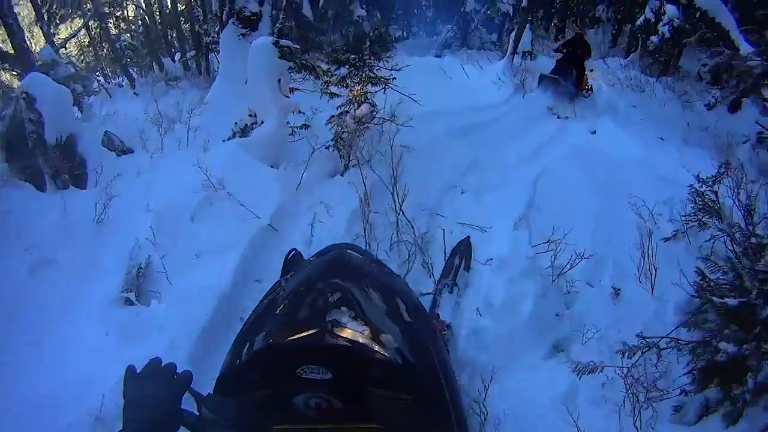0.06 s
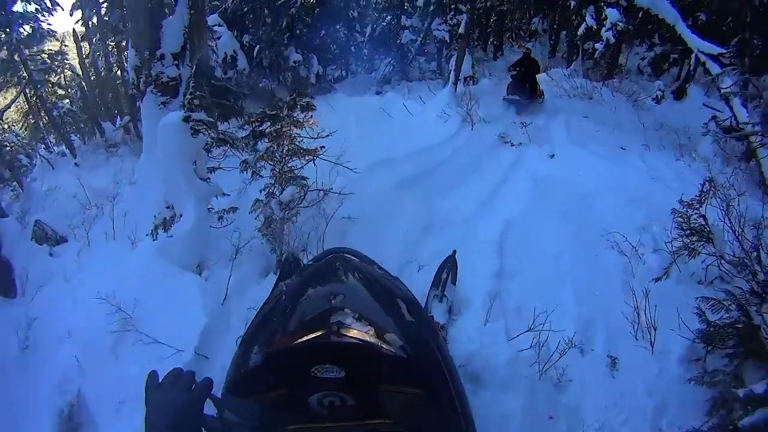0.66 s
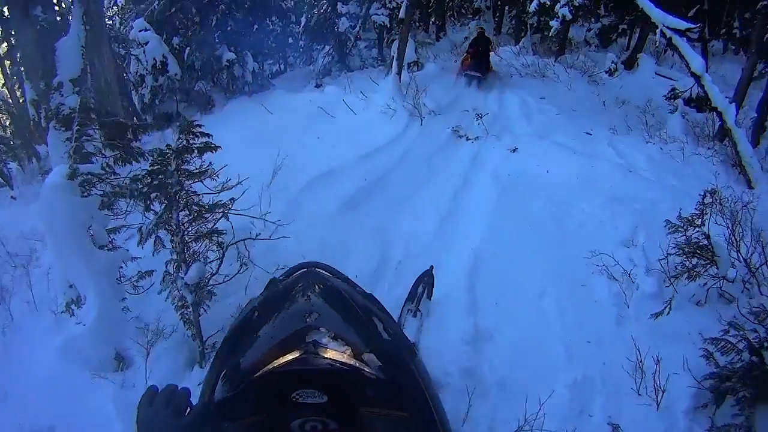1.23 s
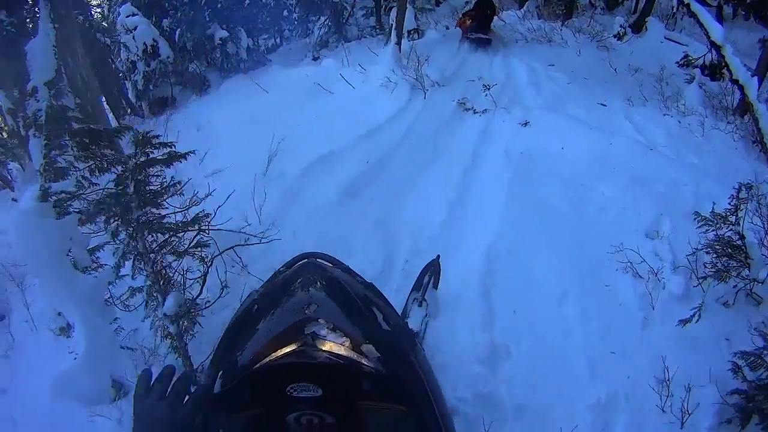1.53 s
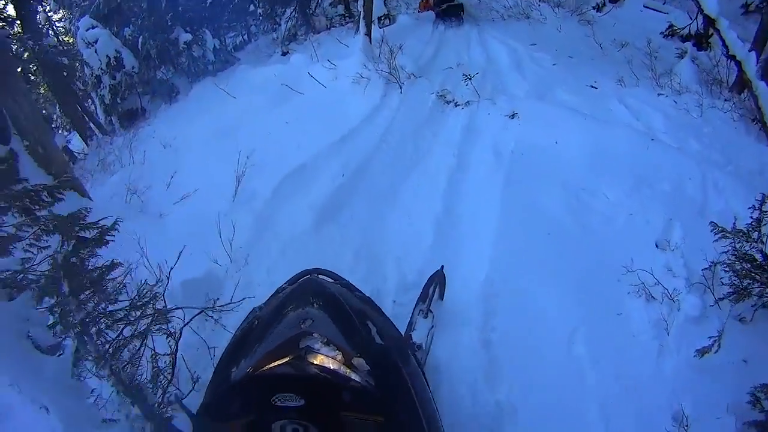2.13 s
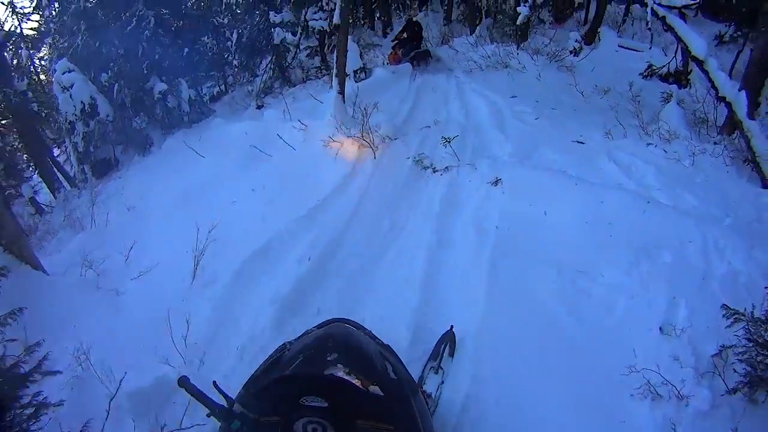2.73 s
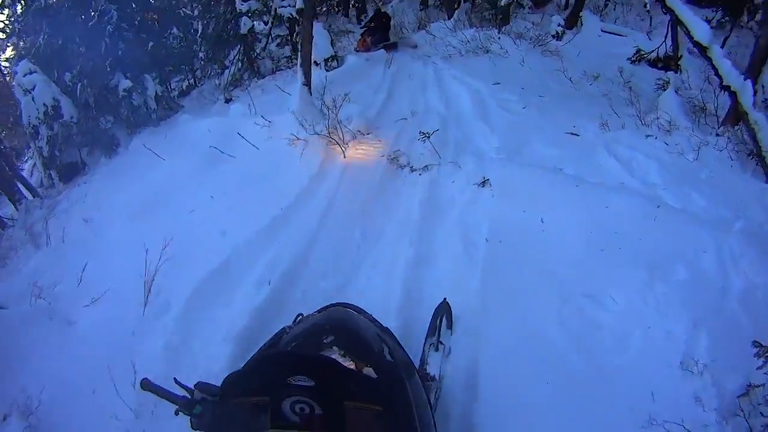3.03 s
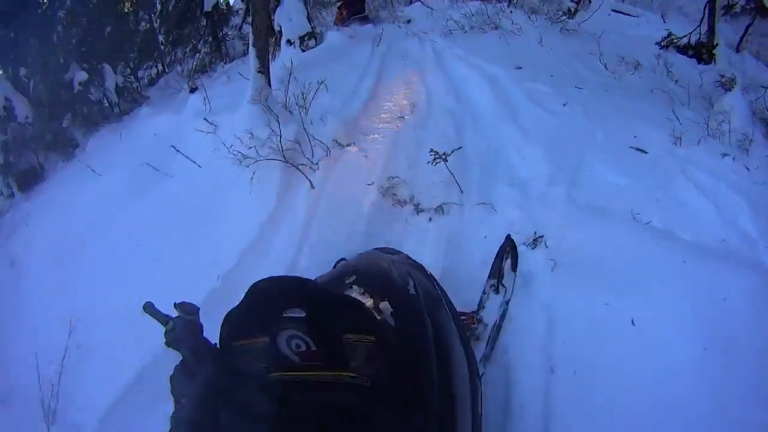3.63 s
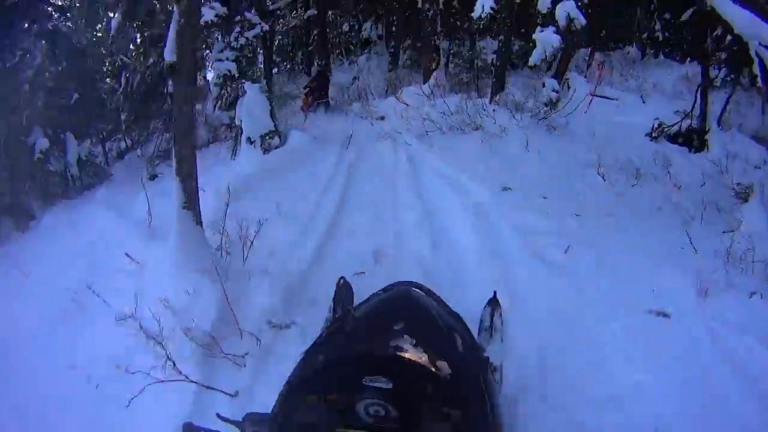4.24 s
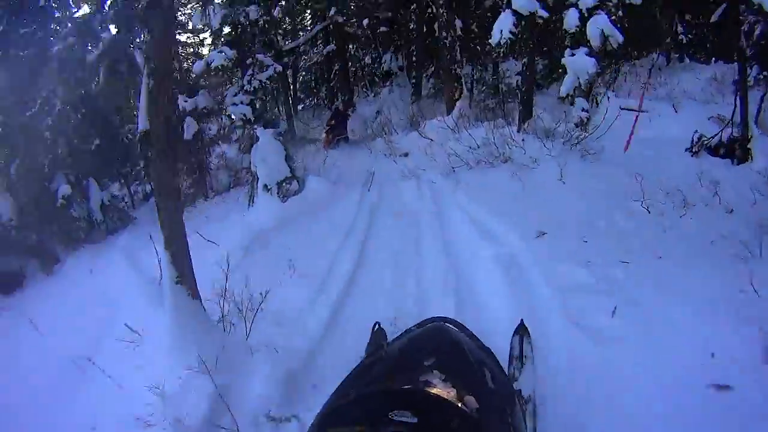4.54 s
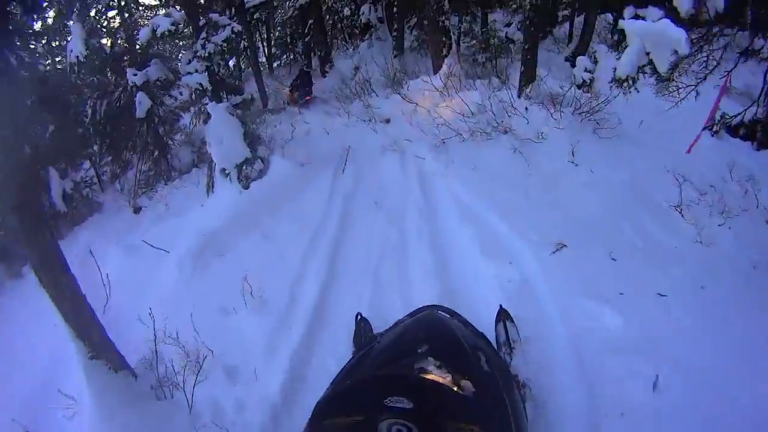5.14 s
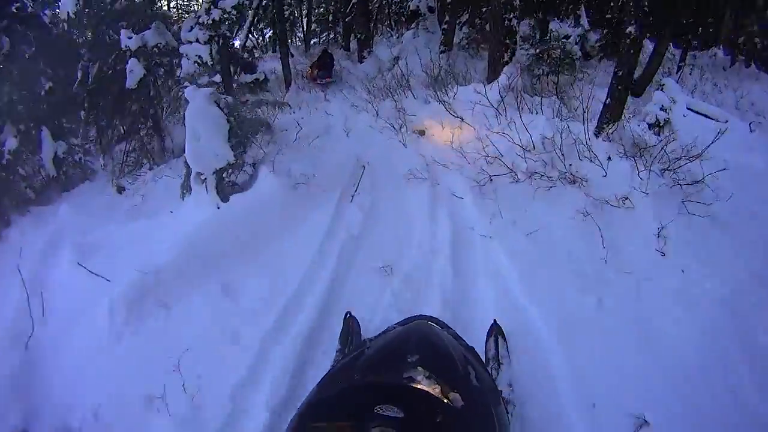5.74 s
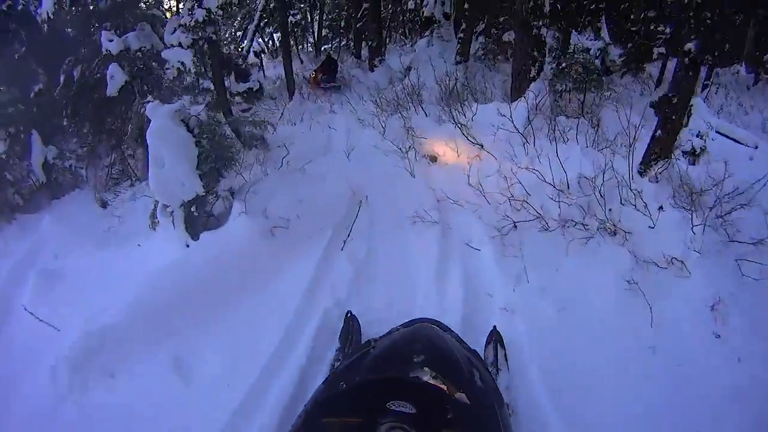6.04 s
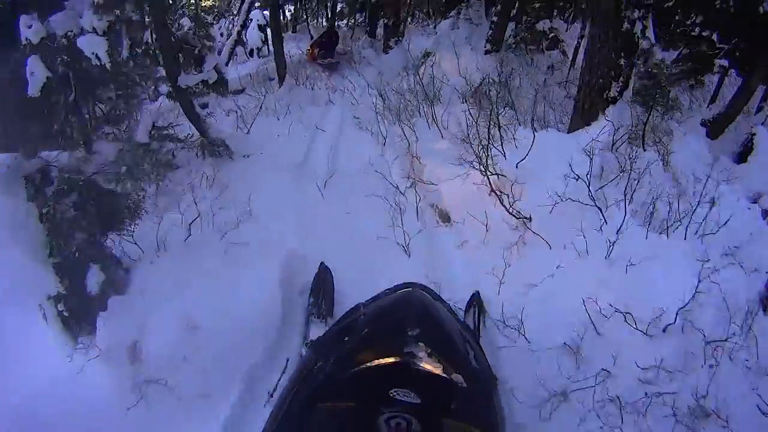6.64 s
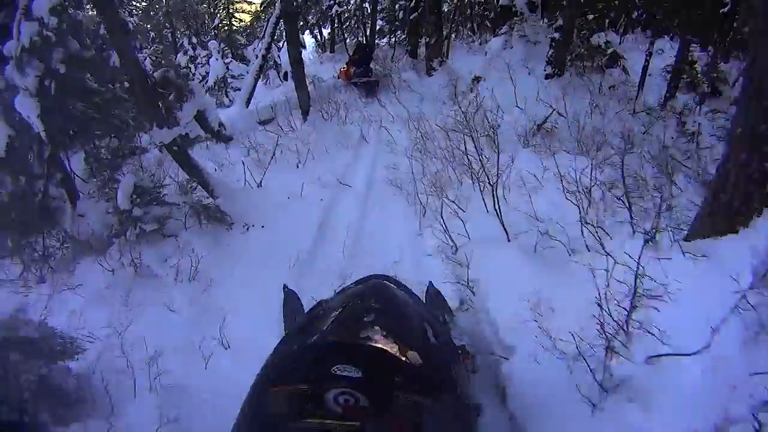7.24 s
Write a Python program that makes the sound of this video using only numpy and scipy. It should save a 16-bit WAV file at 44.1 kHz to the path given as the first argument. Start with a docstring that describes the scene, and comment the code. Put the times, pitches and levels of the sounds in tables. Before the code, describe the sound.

A two-stroke snowmobile creeps along a snowy forest trail, heard close from the rider's helmet. It opens with a short rev, then burbles unevenly over a clattering clutch and the faint hiss of its track. Twigs snap against the hood, one loudly near the middle, and thin branches swish faintly. The engine sags, rises cleanly with a second squeeze of throttle, then burbles on through more twigs.

```python
"""A two-stroke twin snowmobile creeps along a forest trail, heard from the rider's helmet.
It opens with a short squeeze of throttle, then fires unevenly and burbles while clutch and engine case
clatter and the track hisses through snow. Twigs snap against skis and hood, the loudest at 3.4 s, and
branches begin to swish past. After 4 s the engine sags and lugs; near 5 s a second squeeze makes it
rise and run clean, then it burbles on through more twigs."""
import sys
import numpy as np
from scipy.fft import rfft, irfft, next_fast_len
from scipy.io import wavfile
from scipy.ndimage import uniform_filter1d, minimum_filter1d

SR = 44100
rng = np.random.default_rng(int(sys.argv[2]) if len(sys.argv) > 2 else 0)


def dump_mix(stems):
    """Bounce the given channels to the path in sys.argv[1] as a 16-bit WAV at rate SR."""
    frames = np.atleast_2d(stems).T  # one column per channel
    limited = np.clip(frames, -1, 1)  # hard clip at full scale
    pcm = np.round(limited * 32767).astype(np.int16)
    wavfile.write(sys.argv[1], SR, pcm)


N = 325899
TIME = np.arange(N) / SR
SIZE = next_fast_len(N + SR // 2)  # FFT length, with room for ringing tails
FREQS = np.maximum(np.arange(SIZE // 2 + 1) * SR / SIZE, 1)
CRUISE_OPENING = 0.28  # throttle that just keeps the sled creeping along
# resonances of exhaust pipe and air box: (frequency [Hz], width [Hz], level [dB])
PIPE_MODES = [(91, 40, 2), (147.8, 69.6, -0.5), (178.3, 27.9, 4.5), (273.2, 25.3, 3), (404.9, 20.6, -5)]


def exhaust_note(cycle, speed, throttle, pull, waver_db=1.0):
    """The pitched core: throttle sets each harmonic; low ones swell as they meet a pipe resonance."""
    # low harmonics entering the pipe: (firing multiple, shut [dB], cruising [dB], wide open [dB])
    low_harmonics = [(1, -36, -16.5, -13), (2, -11, -20, -17.5), (3, -16.5, -11.5, -7.5)]
    # upper harmonics: (firing multiple, coasting [dB], full pull [dB])
    upper_harmonics = [(4, -40, -30.5), (5, -52.5, -56.5), (6, -52, -36), (7, -62.5, -36),
                       (8, -62.5, -43.5), (9, -58.5, -52.5), (10, -56.5, -54.5), (11, -67, -51),
                       (12, -60, -57)]
    pipe = resonances(PIPE_MODES)
    pipe_gain, pipe_phase = np.abs(pipe), np.unwrap(np.angle(pipe))
    steady_speed = uniform_filter1d(speed, size=8192)
    note = 0
    for k, *levels_db in low_harmonics:
        hz = k * steady_speed
        drive = from_db(np.interp(throttle, [0, CRUISE_OPENING, 1], levels_db))
        phase = 2 * np.pi * k * cycle + np.interp(hz, FREQS, pipe_phase)
        note += drive * np.interp(hz, FREQS, pipe_gain) * np.cos(phase)
    for k, coast_db, pull_db in upper_harmonics:
        level_db = coast_db + (pull_db - coast_db) * pull + waver_db * (1.5 - pull) * drift(7)
        note += from_db(level_db) * np.cos(2 * np.pi * k * cycle)
    return np.sqrt(2) * note


def burble(fired, speed, pull, swap_chance=.71, imbalance=.41, uneven=.47):
    """Each cylinder tends to burn every other turn and slips out of step at random; the pipe rings."""
    turns = len(fired) // 2 + 1
    flips = np.where(rng.random((turns, 2)) < swap_chance, -1, 1)
    bias = imbalance * np.array([1, -1])  # one cylinder is stronger
    burns = (np.cumprod(flips, axis=0) + bias).ravel()[:len(fired)]
    burns += uneven * rng.standard_normal(len(fired))
    muffler = 1 / (1 + (FREQS / 470) ** 10) / (1 + (58 / FREQS) ** 4)
    ring = rms_one(filtered(clicks(fired, burns), resonances(PIPE_MODES) * muffler))
    level_db = -15.5 - 5.5 * pull + .015 * (speed - speed.mean())  # misfiring fades under pull
    return from_db(level_db) * ring


def lugging(cycle, speed, slowest_db=-21, waver_db=4.0):
    """At its slowest the engine fires strong-weak, and the pipe booms between harmonics 1 and 2."""
    level_db = slowest_db - .85 * (speed - speed.min()) + waver_db * drift(12)
    return from_db(level_db) * np.sqrt(2) * np.cos(3 * np.pi * cycle + .5 * drift(6))


def even_swings(pressure, fast_hz=44, slow_hz=3, amount=.59):
    """The pipe's pressure swings stay near one height from turn to turn while their shape changes."""
    fast_power, slow_power = (filtered(pressure ** 2, np.exp(-(FREQS / hz) ** 2)) + 1e-4
                              for hz in (fast_hz, slow_hz))
    return pressure * (slow_power / fast_power) ** amount


def rasp(cycle, pull, level_db=-50.5, throb=.7):
    """Under throttle each firing ends in a puff of turbulent gas."""
    # band of gas tearing out of the pipe: (frequency [Hz], width [Hz], level [dB])
    gas_band = [(840, 750, 0)]
    puffs = stereo_noise(alike=1.0) * (1 + throb * np.cos(2 * np.pi * cycle))
    return from_db(level_db) * pull * rms_one(filtered(puffs, resonances(gas_band) ** 2))


def clatter(cycle, fired, clutch_db, imbalance=.24, uneven=.37, throb=.046, flutter_db=2.5):
    """Pistons knock on the case at each firing; the clutch rattles in step with them."""
    # engine case resonances: (frequency [Hz], width [Hz], level [dB])
    case_modes = [(1228, 13, -6.5), (1392, 98, 0.5), (1575, 310, -3.5)]
    # tone of the clutch rattle: (frequency [Hz], relative level [dB])
    rattle_spectrum = [(700, -28.5), (1080, -8), (1250, 1.5), (1480, 7.5), (1650, 5.5), (1800, -8.5),
                       (1950, -15), (2120, -13.5), (2400, -39.5), (4000, -98.5)]
    hits = 1 + imbalance * (-1) ** np.arange(len(fired)) + uneven * rng.standard_normal(len(fired))
    case = resonances(case_modes) / (1 + (FREQS / 1850) ** 12) / (1 + (900 / FREQS) ** 4)
    knocks = rms_one(filtered(clicks(fired, hits), case))
    shake = (1 + throb * np.cos(2 * np.pi * cycle)) * from_db(flutter_db * drift(32))
    rattle = coloured(stereo_noise(alike=.95) * shake, rattle_spectrum)
    return from_db(clutch_db) * (from_db(-6) * knocks + from_db(-1.4) * rattle)


def whine(cycle, clutch_db, slip_rad=.45):
    """The clutch sings at multiples of the crank's turn, unsteadily as the belt slips."""
    # clutch partials: (firing multiple, relative level [dB])
    partials = [(10, -10), (11.5, -1), (12, -2), (12.5, -3), (13.5, -7)]
    tones = sum(from_db(db) * np.cos(2 * np.pi * k * cycle + slip_rad * drift(20)) for k, db in partials)
    level_db = -51 + 1.3 * (clutch_db - clutch_db.mean())  # swells with the clatter
    return from_db(level_db) * tones


def chassis(cycle, drag_db, pull, air_db=-29, frame_db=-35.5, settle_db=10, throb=.06):
    """Intake air rushes in pulses over the shaking frame, which settles when the engine pulls clean."""
    # tone of the intake rush: (frequency [Hz], relative level [dB])
    intake_spectrum = [(40, -17), (150, 5.5), (400, 6.5), (490, -3.5), (760, -7), (1050, -16.5),
                       (1400, -18), (2500, -69.5)]
    # low shudder of the frame: (frequency [Hz], relative level [dB])
    frame_spectrum = [(10, -9.5), (25, -7), (40, 16.5), (55, 3), (90, 15), (200, -49.5)]
    pulsing = 1 + throb * np.cos(2 * np.pi * cycle)
    air = coloured(stereo_noise(alike=.64) * pulsing, intake_spectrum)
    frame = coloured(stereo_noise(alike=.85), frame_spectrum)
    return from_db(air_db + drag_db) * air + from_db(frame_db - settle_db * pull) * frame


def track(cycle, drag_db, rails_db=-51.5, snow_db=-66.5, throb=.1, grain_db=1):
    """The track scrapes over its rails, shaken once a turn, and the skis throw up grainy snow."""
    # scrape of the rails: (frequency [Hz], relative level [dB])
    rail_spectrum = [(1290, -40), (2200, 1.5), (2500, -3.5), (2780, 2), (3030, 4), (3190, 2.5), (3440, -4),
                     (4110, -5), (4520, -5.5), (4890, 2), (5330, 2.5), (5740, -1.5), (6340, -11.5),
                     (8670, -5), (10800, -54.5), (14000, -59), (22000, -120)]
    # hiss of the snow spray: (frequency [Hz], relative level [dB])
    spray_spectrum = [(4000, -21.5), (6000, -4), (6700, 3.5), (7700, 2.5), (8600, 3), (9300, -3.5),
                      (10500, -10), (12000, -14.5)]
    shake = (1 + throb * np.cos(np.pi * cycle)) * from_db(grain_db * drift(48))
    tunnel = 1 / (1 + (FREQS / 6500) ** 14)
    rails = rms_one(filtered(stereo_noise(alike=.38) * shake, from_db(at_hz(rail_spectrum)) * tunnel))
    snow = coloured(stereo_noise(alike=.31) * from_db(1.5 * drift(300)), spray_spectrum)
    return from_db(rails_db + .54 * drag_db) * rails + from_db(snow_db + .7 * drag_db) * snow


def twigs():
    """Each twig breaks in a burst of a few ms that knocks on the hood and cracks in the treble."""
    # twigs hitting the sled: (time [s], burst level [dB], brightness [dB], decay [s])
    snaps = [(.6487, -37, -14, .002), (2.0193, -37, -22, .002), (3.273, -37, -22, .002),
             (3.4275, -15.5, -25, .002), (3.5034, -40, -22, .005), (3.625, -39, -16, .012),
             (3.642, -26, -26, .004), (6.3969, -38, -20, .002), (6.4528, -34, -10, .002),
             (7.006, -33, -22, .003), (7.1744, -45, -7, .003), (7.2526, -36, -20, .002),
             (7.282, -35, -24, .002)]
    # resonances of hood and skis: (frequency [Hz], width [Hz], level [dB])
    hood_modes = [(780, 170, 8), (1350, 400, 6), (2150, 170, 7), (3300, 450, -2), (5400, 900, -12)]
    knock, crack = np.zeros(N), np.zeros(N)
    for start, db, bright_db, decay_s in snaps:
        burst = (TIME >= start) * np.exp(-np.minimum(np.abs(TIME - start) / decay_s, 20))
        knock += from_db(db) * burst
        crack += from_db(db + bright_db) * burst
    knock = filtered(knock * stereo_noise(alike=.7), 2.4 * resonances(hood_modes))
    crack = filtered(crack * stereo_noise(alike=.6), 1.6 * resonances([(7000, 5000, 0)]))
    return knock + crack


def branches():
    """Thin branches swish over the hood, each swelling and fading."""
    # passing branches: (centre time [s], length [s], peak level [dB])
    swishes = [(3.76, .22, -64), (5.809, .12, -70), (6.397, 0.15, -68)]
    grains = stereo_noise(alike=.5) * from_db(2 * drift(200))
    hiss = rms_one(filtered(grains, resonances([(8500, 3500, 0)]) ** 2))
    swells = sum(from_db(db) * np.exp(-(2 * (TIME - s) / length) ** 2) for s, length, db in swishes)
    return swells * hiss


def from_db(db):
    """Decibels to gain."""
    return 10 ** (np.asarray(db) / 20)


def rms_one(x):
    """Scale to unit rms."""
    return x / np.sqrt(np.mean(x ** 2) + 1e-20)


def in_time(rows):
    """A (time, value) curve at every sample."""
    return np.interp(TIME, *np.transpose(rows))


def at_hz(points):
    """A (frequency, value) curve read on a log-frequency axis."""
    hz, value = np.transpose(points)
    return np.interp(np.log(FREQS), np.log(hz), value)


def filtered(x, response):
    """Pass x through a frequency response."""
    return irfft(rfft(x, SIZE) * response, SIZE)[..., :N]


def coloured(noise, spectrum):
    """Noise shaped by an EQ curve in dB, at unit rms."""
    return rms_one(filtered(noise, from_db(at_hz(spectrum))))


def resonances(modes):
    """Response of parallel resonances (Hz, width in Hz, dB) with alternating signs."""
    return sum((-1) ** k * from_db(db) / (1 + 1j * (FREQS ** 2 - hz ** 2) / (FREQS * width))
               for k, (hz, width, db) in enumerate(modes))


def drift(rate_hz):
    """Smooth random wander at unit rms."""
    return rms_one(filtered(rng.standard_normal(N), 1 / (1 + (FREQS / rate_hz) ** 2)))


def stereo_noise(alike):
    """White noise, from wide (alike=0) to mono (alike=1)."""
    shared, own = rng.standard_normal(N), rng.standard_normal((2, N))
    return np.sqrt(alike) * shared + np.sqrt(1 - alike) * own


def clicks(samples, sizes):
    """Impulses at the given samples."""
    return np.bincount(samples, sizes, N)[:N]


def scene():
    """The crank paces engine, clutch and track; the mix reaches each side at its own phase and level."""
    # engine speed: (time [s], rate [firings/s])
    speed_curve = [(0, 116), (.26, 137.5), (.48, 124), (.76, 119.8), (1.2, 126), (1.55, 123.9), (2.15, 125),
                   (3.5, 121.8), (4.05, 116.2), (4.57, 114.3), (4.78, 131.8), (5.11, 141), (5.33, 125.3),
                   (5.75, 122.2), (6.35, 125), (6.6, 123), (6.96, 127), (7.39, 116)]
    # throttle, squeezed twice: (time [s], opening [0-1])
    throttle_curve = [(0, 0), (0.089, 0.38), (.13, 0.43), (0.251, 0.9), (0.298, 0.27), (.55, 0.2),
                      (1.001, 0.19), (2.999, 0.24), (3.45, 0.08), (4.02, 0.03), (4.3, 0.2), (4.72, 0.31),
                      (4.9, 1), (5.12, 0.8), (5.17, 0.16), (5.949, 0.21), (6.55, 0.25), (7.05, 0.31),
                      (7.39, 0.04)]
    # clutch and case clatter: (time [s], level [dB])
    clutch_curve = [(0, -42), (.7, -39.5), (1.0, -35.5), (2.35, -40), (3.35, -36.5), (4.4, -38),
                    (4.75, -41.5), (5.75, -40), (6.8, -35), (7.39, -38)]
    # how hard the sled drags through the snow: (time [s], level about the usual [dB])
    drag_curve = [(0, 3), (1.0, 0), (2.0, 0.1), (2.7, -2), (3.6, 2.5), (4.2, -1.5), (4.6, 1.5), (5.5, -2.5),
                  (6.05, -1.5), (6.45, 1.5), (7.39, 3)]
    # stereo phase at the helmet: (frequency [Hz], left lead [rad])
    side_phase = [(20, .4), (86, .69), (172, .96), (258, 1.15), (387, 1.38), (600, 1.7), (1030, .9),
                  (1460, 1.05), (2070, -.2), (3000, .7), (4100, 1.8), (5200, -.7), (6900, -1.4), (8600, 0)]
    # stereo balance at the helmet: (frequency [Hz], left minus right [dB])
    side_balance = [(30, -.5), (80, .6), (150, 1.4), (400, 1.6), (650, 2.4), (960, 3), (1450, 1.9),
                    (2100, -1), (2700, 4), (3400, 0), (4100, -3), (4700, 0), (5400, -2), (6600, 2),
                    (8000, -.5)]
    speed, throttle = in_time(speed_curve), in_time(throttle_curve)
    clutch_db, drag_db = in_time(clutch_curve), in_time(drag_curve)
    pull = np.interp(throttle, [CRUISE_OPENING, 1], [0, 1])  # share of the throttle beyond cruising
    cycle = np.cumsum(speed * (1 + .002 * drift(15))) / SR  # counts firings, two to a crank turn
    fired = np.flatnonzero(np.diff(np.floor(cycle)))  # sample of each firing
    pipe = burble(fired, speed, pull) + exhaust_note(cycle, speed, throttle, pull)
    pipe += lugging(cycle, speed)
    engine = even_swings(pipe) + rasp(cycle, pull)
    drive = clatter(cycle, fired, clutch_db) + whine(cycle, clutch_db)
    sled = engine + drive + chassis(cycle, drag_db, pull) + track(cycle, drag_db) + twigs() + branches()
    side = np.array([[.5], [-.5]])
    return filtered(sled, from_db(side * at_hz(side_balance)) * np.exp(1j * side * at_hz(side_phase)))


def record(dry):
    """A fast limiter catches the highest peaks; a steep low-pass cuts the top."""
    boost_db, ceiling, release_db_per_s, cutoff_hz = .7, .58, 200, 10900
    loud = dry * from_db(boost_db)
    over_db = 20 * np.log10(np.maximum(np.abs(loud).max(axis=0) / ceiling, 1))
    held_db = np.maximum.accumulate(over_db + release_db_per_s * TIME) - release_db_per_s * TIME
    gain_db = uniform_filter1d(minimum_filter1d(-held_db, size=221), size=221)  # eased over 5 ms
    return filtered(loud * from_db(gain_db), 1 / np.sqrt(1 + (FREQS / cutoff_hz) ** 160))


dry = scene()
out = record(dry)
dump_mix(out)
```